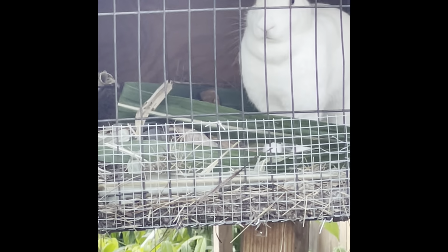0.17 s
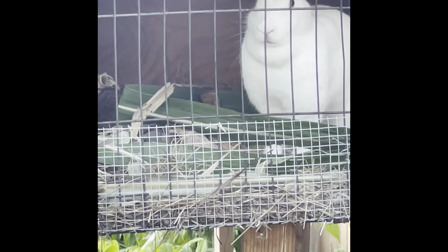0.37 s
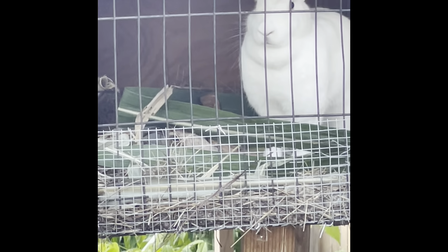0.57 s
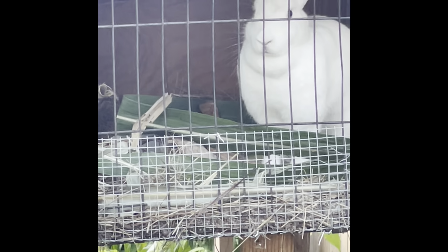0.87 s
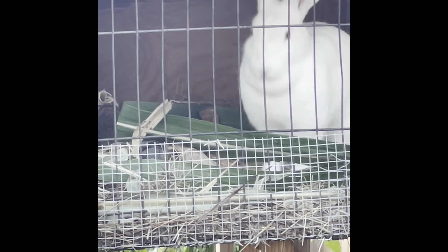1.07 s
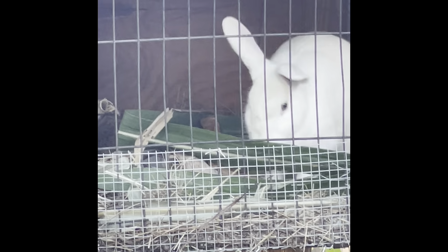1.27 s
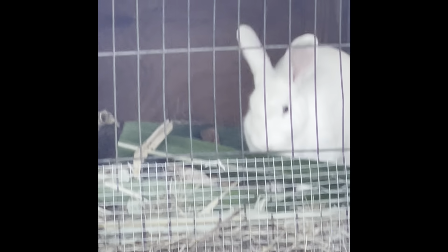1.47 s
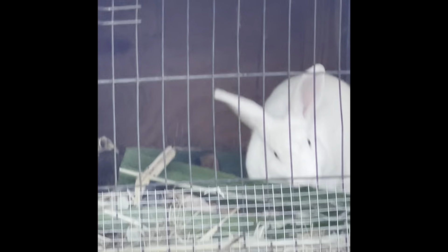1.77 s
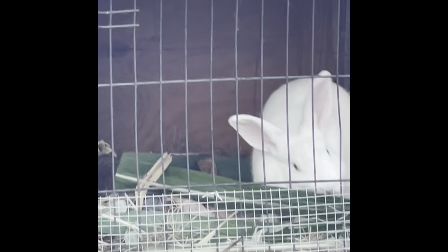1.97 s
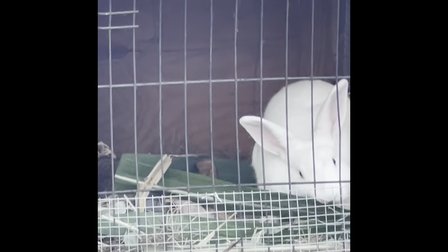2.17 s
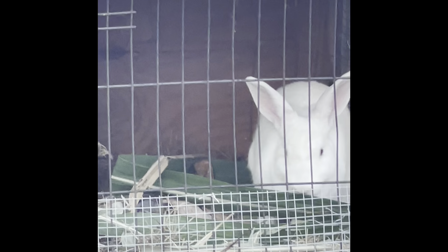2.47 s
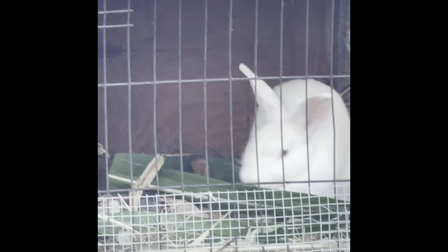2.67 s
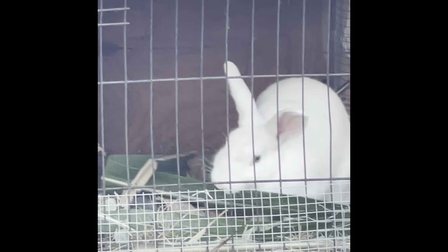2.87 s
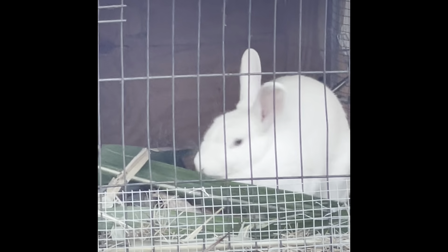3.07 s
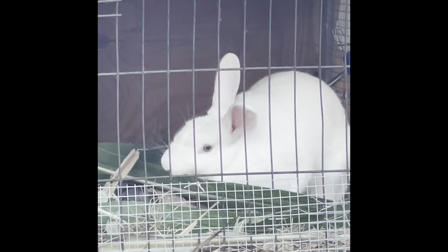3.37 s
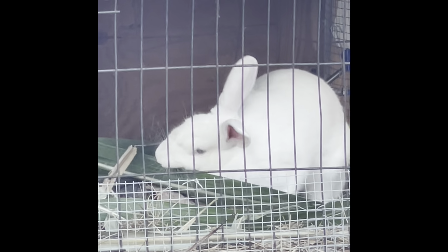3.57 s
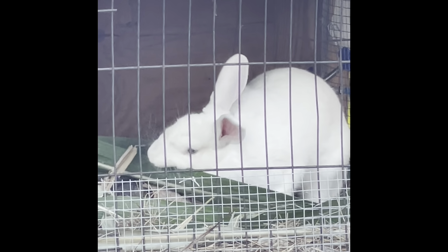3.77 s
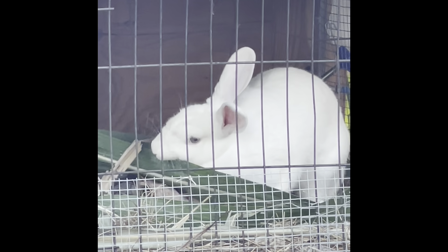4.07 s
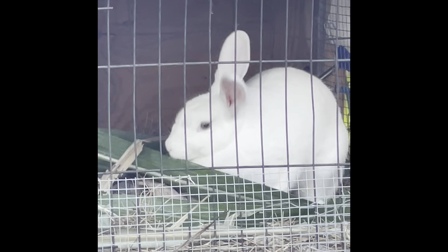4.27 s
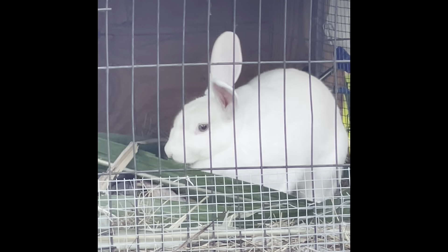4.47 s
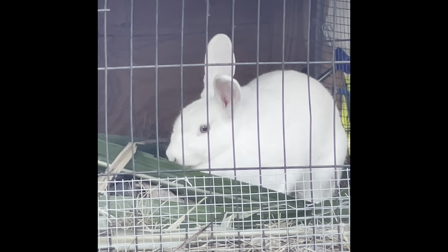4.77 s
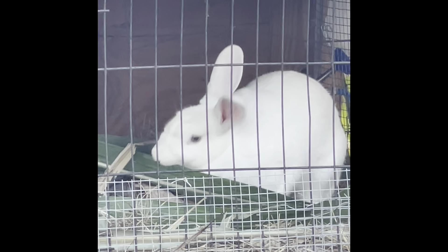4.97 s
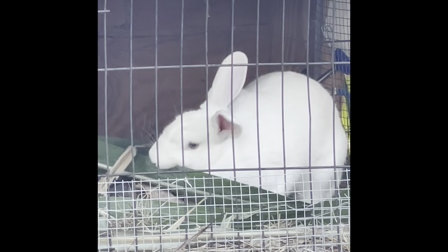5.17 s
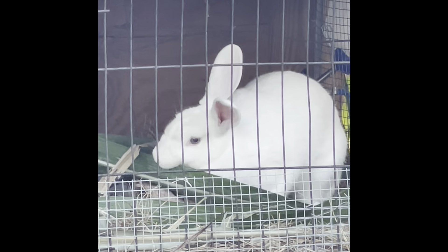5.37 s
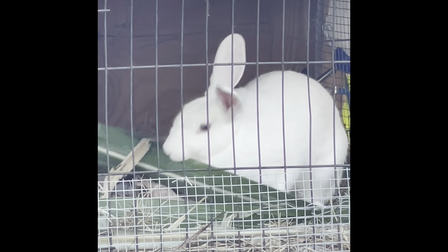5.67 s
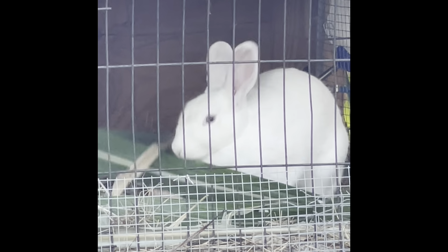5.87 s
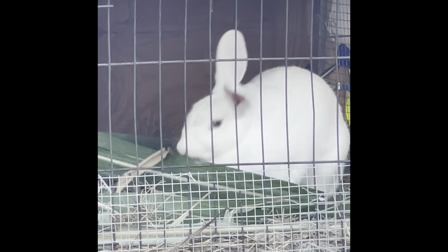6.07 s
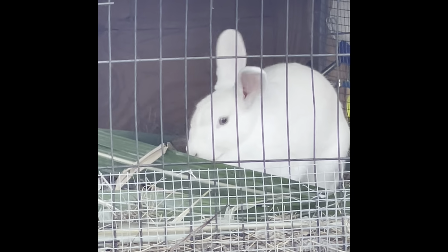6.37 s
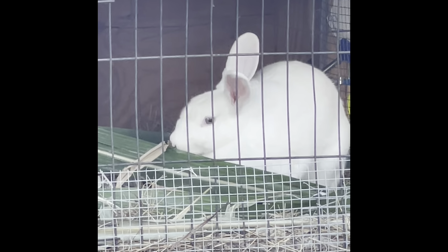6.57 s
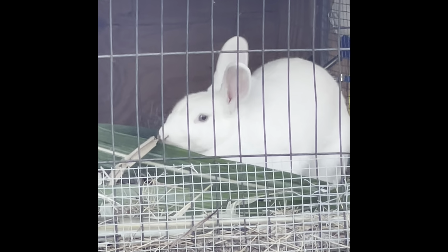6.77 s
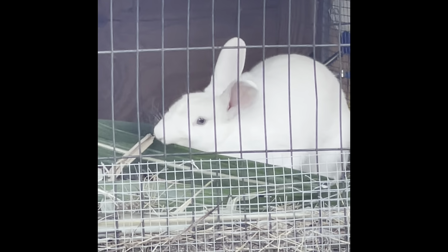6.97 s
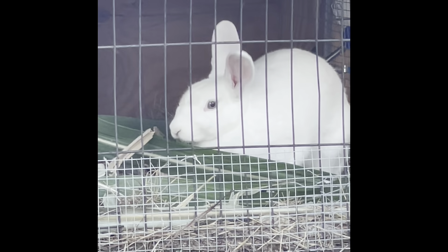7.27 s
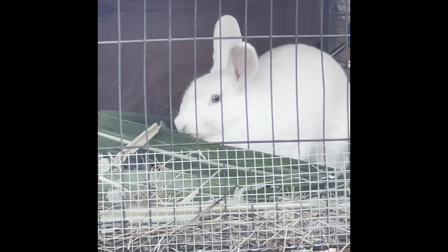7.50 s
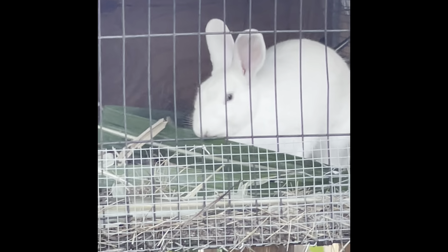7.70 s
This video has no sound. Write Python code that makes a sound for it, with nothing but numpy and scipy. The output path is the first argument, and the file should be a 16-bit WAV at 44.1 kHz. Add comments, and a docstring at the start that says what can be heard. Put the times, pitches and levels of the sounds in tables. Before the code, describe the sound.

A quiet garden has a continuous deep rumble, a soft, gently swelling neighbourhood wash and thin, high microphone hiss. At about 1.0 s a nearby jay gives a harsh call lasting under a third of a second: a raspy upward scoop, a clearer piercing note, then a rough drop, with brief outdoor echoes. Similar calls come at 3.1 and 5.2 s. At 1.7 s there is a small crisp leaf rustle. Around 2.0 s a distant jay answers, duller and much quieter, alongside a tiny high chip; more faint, sagging chips come near 2.5, 4.1 to 4.5, and 6.9 to 7.4 s. The rabbit scrapes leaves and straw lightly around 2.9, 3.9 and 5.8 s, with a tick near 7.2 s. The far jay replies at 7.6 s, the near one calls lastly at 7.9 s, and dry rustling becomes busiest from 8.2 s to the end at 8.5 s.

```python
"""A garden, over a low outdoor rumble, a neighbourhood wash and microphone hiss, all shaped noise.
At 1 s a near blue jay gives the first of four harsh calls, about two seconds apart up to 3.1 and 5.2 s,
the last at 7.9 s: harmonic stacks broken by a rasp. A far jay answers at 2 and 7.6 s in the same kind of voice.
From 1.7 s a rabbit stirs leaves and straw in its wire hutch, grainy noise busiest after 8.2 s.
Between 2 and 7.5 s a small far bird chips now and then: short sagging sine notes."""
import sys
import numpy as np
from scipy import signal
from scipy.fft import rfft, irfft, next_fast_len
from scipy.io import wavfile
from scipy.ndimage import map_coordinates

SR = 44100
rng = np.random.default_rng(int(sys.argv[2]) if len(sys.argv) > 2 else 0)


def bounce(signal):
    """Save signal as a 16-bit WAV file at the path given by the first command-line argument."""
    frames = np.transpose(np.atleast_2d(signal))
    limited = np.clip(frames, -1, 1)
    pcm = np.round(limited * 32767).astype(np.int16)
    wavfile.write(sys.argv[1], SR, pcm)


N = 376525

# Spectrum of the low outdoor rumble. Each row: frequency in Hz, relative density in dB per Hz.
RUMBLE_SPECTRUM = [(16, -42), (27, -21), (35, -5), (40, 7.5), (45, -1.5), (70, 1.2), (85, -0.25),
                   (110, -1.5), (143, .5), (172, -6.5), (194, -4), (215, -8), (310, -15.5), (600, -40.5),
                   (1500, -120)]
# Spectrum of the far wash of the neighbourhood. Each row: frequency in Hz, relative density in dB per Hz.
WASH_SPECTRUM = [(150, -40), (330, -0.5), (480, -1.07), (650, -1.93), (1000, -7), (1400, -15.5),
                 (2000, -25), (3000, -35.5), (4000, -47), (5500, -45.5), (12000, -73.5)]
# Slow course of the wash. Each row: time in seconds, relative level in dB.
WASH_COURSE = [(0.0, -49), (7.37, -51.5), (7.39, -52.5), (8.51, -50.5), (8.54, -53)]
# Likeness of left and right in background and hiss. Each row: frequency in Hz, correlation.
LEFT_RIGHT_LIKENESS = [(120, .996), (300, .983), (480, .91), (700, .63), (1200, .26), (1600, .8),
                       (2000, .93), (5000, .91), (8000, .95)]
# Resonances in the microphone hiss. Each row: centre in Hz, width in Hz, relative level in dB.
HISS_BANDS = [(5147, 140, -3), (6637, 290, 0.5), (8340, 550, 1), (11100, 1930, -13.5)]
# Phase by which the recorder's stereo widening sets the left channel ahead of the right. Each row: frequency in
# Hz, lead in radians.
LEFT_LEAD = [(450, 0), (750, .5), (1200, -1.1), (1700, 0), (2700, .7), (4100, .75), (4700, 2.2),
             (5050, 4.4), (5500, 6.2), (6200, 6.4), (8900, 9.3), (9600, 9.55), (11900, 12.4), (14000, 12.6)]
TOP_HZ = 14350  # upper limit of the microphones

# First echoes from hutch, fence and trees. Each row: delay in seconds, level in dB re the direct sound.
FIRST_ECHOES = [(.0043, -8.5), (.011, -8.5), (0.022, -13), (.041, -18), (0.065, -24)]
# The far wall, heard through foliage. Each row: frequency in Hz, echo level in dB re the direct sound.
FAR_WALL_ECHO = [(1900, -22), (2950, -14.5), (4000, -20), (6000, -13), (9000, -25)]
# Dying away of the garden's scatter. Each row: frequency in Hz, time to fall 60 dB in seconds.
GARDEN_DECAY = [(1000, 0.31), (3000, 0.792), (6000, 0.57), (12000, 0.13)]

# Notes of the small far bird. Each row: middle in seconds, pitch there in Hz, relative level in dB,
# half length in seconds.
CHIP_NOTES = [(1.969, 4100, -77, 0.044), (2.48, 4440, -83, 0.14), (4.084, 3890, -82, 0.043),
              (4.29, 4430, -84, 0.066), (4.491, 4360, -83, 0.056), (6.931, 3530, -84, 0.062),
              (7.04, 4002, -82, .06), (7.22, 4560, -82, .07), (7.44, 4440, -81, .045)]

# Moves of the rabbit. Each row: peak time in seconds, relative level of the leaves in dB,
# rise constant in seconds, time to fall 60 dB in seconds, level of the stalks in dB re the leaves.
RABBIT_MOVES = [(1.73, -58.5, 0.00089, 0.12, -17.5), (2.875, -69, 0.016, 0.28, 2),
                (3.822, -66.5, .004, 0.11, 4.5), (3.937, -61.5, 0.00204, 0.115, 1.5),
                (5.69, -72.5, 0.09, 0.55, 6.5), (5.865, -76.5, 0.0135, 0.18, 10),
                (7.159, -65, .001, 0.041, -16.5), (8.213, -57, 0.043, 0.2, 1),
                (8.35, -70.5, 0.045, 0.35, 6), (8.43, -73.5, 0.018, 0.32, 1.5),
                (8.465, -67, .005, 0.12, 9.5), (8.51, -56.5, 0.0081, 0.153, 3.5)]
# Spectrum of dry leaves. Each row: frequency in Hz, relative density in dB per Hz.
LEAF_SPECTRUM = [(2500, -31), (5000, -3), (7000, 4), (8500, 3.5), (11500, 6), (14000, -37.5)]
# Spectrum of scraped stalks. Each row: frequency in Hz, relative density in dB per Hz.
STALK_SPECTRUM = [(500, -29), (1500, 8), (3200, 2), (5500, -1.5), (8000, -31)]

# Throat of the far jay, dulled by distance. Each row: frequency in Hz, gain in dB.
FAR_JAY_THROAT = [(1700, 2), (2550, -6.5), (3350, -2.5), (4150, -17.5), (5100, -18), (5950, -5),
                  (7000, -14), (9000, -35)]
# Calls of the far jay. Each row: start in seconds, length in seconds, opening pitch in Hz,
# share of the pitch lost by the end, relative level in dB.
FAR_JAY_CALLS = [(2.019, .31, 870, .125, -69), (7.615, .256, 845, .055, -69)]
# Far jay: dB added at both ends, second harmonic in dB, treble in dB
ANSWER_ENDS_DB, ANSWER_SECOND_DB, ANSWER_TREBLE_DB = -0.5, -10, -11
ANSWER_ROUGH, ANSWER_ENDS_ROUGH = 0.15, 0.15  # roughness 0-1 in the middle, and what the ends add

# Throat and beak of the near jay. Each row: frequency in Hz, gain in dB.
NEAR_JAY_THROAT = [(1400, 2), (1980, 4), (2450, -11.5), (2950, 0), (3500, -10), (4100, -2), (4700, -5.5),
                   (5200, -6), (6000, -2.5), (7000, -5.5), (8200, -12.5), (9600, -19.5), (11200, -16.5),
                   (13500, -54)]
# Calls of the near jay. Each row: start in seconds, time until the voice breaks in seconds, top pitch in Hz,
# share of the pitch it scoops up from below, sag in Hz per second, relative level in dB,
# second harmonic in dB, treble in dB, roughness of the attack 0-1, time until the swell in seconds,
# swell in dB, length of the broken tail in seconds.
NEAR_JAY_CALLS = [(1.037, 0.21, 1038, 0.21, 550, -51.5, 2, -3.5, 0.93, 0.144, 6.5, 0.074),
                  (3.117, 0.16, 1019, 0.16, 530, -52.5, 2.5, -4.5, .8, 0.099, 3.5, 0.086),
                  (5.219, .184, 1027, .14, 562, -53.5, 4.5, -2, 0.38, .121, 9.5, .078),
                  (7.913, 0.15, 985.6, 0.19, 300, -53, -0.5, -5, .8, 0.091, 3, 0.096)]
JITTER = 0.062  # pitch scatter of a fully harsh voice, near or far, as a share of the pitch
SCOOP_S, CREST_S = 0.04, 0.078  # time constant of the scoop; time after which the pitch sags
DROP, DROP_S = 0.29, 0.032  # share of the pitch lost once the voice breaks; time constant of that loss
ATTACK_S, RELEASE_S = 0.015, 0.03  # rise of the level (both ends of a far call) and final fade
CLEAR_S, CLEARING_S, BREAK_S = 0.052, 0.021, 0.0083  # time until clear; time to clear; time to break
# Roughness 0-1 of the clear middle and of the tail; time constant of the tail settling
CLEAR_ROUGH, TAIL_ROUGH, SETTLE_S = 0.074, 0.85, 0.091
BURST_DB, TAIL_DB, TIRE_DB_PER_S = 6, 1.5, 14  # push of attack and tail; loss of level after the crest
ATTACK_SECOND_DB, SECOND_FADE_DB_PER_S = -12, 62  # second harmonic: weak in the attack, fades after the crest
ATTACK_TREBLE_DB, TAIL_TREBLE_DB = -3, -1  # the harsh ends are duller
SWELL_S = 0.0085  # half width of the swell


def amp(db):
    """Decibels to gain."""
    return 10 ** (np.asarray(db) / 20)


def unit(x):
    """x at rms 1."""
    return x / np.sqrt(np.mean(x ** 2) + 1e-20)


def along(points, hz):
    """Points of frequency and value, read on a log frequency axis."""
    f, v = np.transpose(points)
    return np.interp(np.log(hz + 1), np.log(f + 1), v)


def ramp(t, length):
    """0 before t = 0, rising straight to 1 over the length."""
    return np.clip(t / length, 0, 1)


def wobble(rate, size=N):
    """A smooth random curve, rate knots a second."""
    knots = rng.standard_normal(int(size * rate / SR) + 4)
    return map_coordinates(knots, [np.arange(size) * rate / SR])


def filtered(x, response):
    """x times a complex response of frequency."""
    m = next_fast_len(N + SR // 2)
    return irfft(rfft(x, m) * response(np.fft.rfftfreq(m, 1 / SR)), m)[..., :N]


def noise(spectrum):
    """Coloured noise of rms 1."""
    return unit(filtered(rng.standard_normal(N), lambda hz: amp(along(spectrum, hz))))


def diffuse(gain):
    """Stereo noise of rms 1 from all around: sum and difference set how alike left and right are."""
    def mid_side(hz):
        turn = np.arccos(np.clip(along(LEFT_RIGHT_LIKENESS, hz), -1, 1)) / 2
        return gain(hz) * np.array([np.cos(turn), np.sin(turn)])

    mid, side = filtered(rng.standard_normal((2, N)), mid_side)
    return unit(np.array([mid + side, mid - side]))


def background(rumble_db=-40.0, wash_db=1.5, swell_db=0.55):
    """A deep steady rumble under a wider, gently swelling wash, both filtered noise."""
    course_db = np.interp(np.arange(N) / SR, *np.transpose(WASH_COURSE))
    rumble = amp(rumble_db) * diffuse(lambda hz: amp(along(RUMBLE_SPECTRUM, hz)))
    wash = diffuse(lambda hz: amp(along(WASH_SPECTRUM, hz)))
    return rumble + amp(course_db + wash_db + swell_db * wobble(5)) * wash


def hiss(level_db=-70.5, flat_db=-26):
    """Microphone hiss, gathered in a few narrow bands over a thin broad bed."""
    def gain(hz):
        bed = amp(flat_db + along([(7000, -1.5), (10000, -21), (14000, -9.0)], hz))
        band_power = sum(amp(db) ** 2 / (1 + (2 * (hz - centre) / width) ** 4)
                         for centre, width, db in HISS_BANDS)
        return np.sqrt(bed ** 2 + band_power)

    return amp(level_db) * diffuse(gain)


def garden(x, width=0.14):
    """Scatter from the foliage: a noise tail in which each frequency dies at its own speed."""
    hz, t, z = signal.stft(rng.standard_normal((2, SR)), SR, nperseg=256)
    decay = amp(-60 * t / along(GARDEN_DECAY, hz)[:, None])
    tail = signal.istft(z * decay, SR, nperseg=256)[1]
    tail = tail / np.linalg.norm(tail[0])
    mid, side = signal.fftconvolve(x[None], tail, axes=1)[:, :N]
    return np.array([mid + width * side, mid - width * side])


def walls(x, far_delay=0.1):
    """Direct sound, first echoes that make gliding harmonics swell and fade, and one late slap."""
    def echo(hz, delay, db):
        return amp(db) * np.exp(-2j * np.pi * hz * delay)

    def response(hz):
        first = sum(echo(hz, delay, db) for delay, db in FIRST_ECHOES)
        return 1 + first + echo(hz, far_delay, along(FAR_WALL_ECHO, hz))

    return filtered(x, response)


def small_bird(fall=0.022):
    """Short, thin sine notes that quiver and sag a little in pitch."""
    out, quiver = np.zeros(N), wobble(250)
    for middle, hz, db, half in CHIP_NOTES:
        i = np.arange(int((middle - half) * SR), int((middle + half) * SR))
        pitch = hz * (1 - fall * (i / SR - middle) / half + 0.014 * quiver[i])
        tone = np.sin(2 * np.pi * np.cumsum(pitch) / SR)
        out[i] += amp(db + 6.5) * np.hanning(len(i)) * tone
    return out


def rabbit(grain_db=2.0):
    """Each move crackles dry leaves and scrapes stalks, as noise under a grainy, decaying push."""
    t, leaves, stalks = np.arange(N) / SR, np.zeros(N), np.zeros(N)
    for peak, db, rise, t60, stalk_db in RABBIT_MOVES:
        decay = amp(db - 60 * np.maximum(t - peak, 0) / t60)
        push = decay * np.exp(np.minimum(t - peak, 0) / rise)
        leaves += push
        stalks += push * amp(stalk_db)
    grains = unit(amp(grain_db * wobble(700)))
    return grains * (leaves * noise(LEAF_SPECTRUM) + stalks * noise(STALK_SPECTRUM))


def jay(calls, throat, rasp, rasp_hz, air_db, focus_db, uneven_db, count=14):
    """A jay's voice: a harmonic stack, coloured by the throat, that breaks into a rasp where rough."""
    out = np.zeros(N)
    shake, drift = wobble(560), wobble(300)
    air = noise([(100, -3), (380, -2.0), (900, -25), (2000, -80)])
    order = np.arange(2, count)[:, None]  # the throat holds the fundamental back
    for i, pitch, gain, second_db, treble_db, rough, strain in calls:
        phase = 2 * np.pi * np.cumsum(pitch * (1 + JITTER * rough * shake[i])) / SR
        hz = order * pitch
        treble_share = along([(4400, 0.13), (5400, 0.99)], hz)
        colour_db = along(throat, hz) + second_db * (order == 2) + treble_db * treble_share
        # strain at the ends shifts the balance between the fourth harmonic and the others
        press_db = focus_db * strain * (np.exp(-((order - 4.25) / 0.57) ** 2) - 0.45)
        # each harmonic swells and fades a little on its own
        sway_db = uneven_db * np.array([wobble(44.9, size=SR // 2)[:len(i)] for _ in order])
        level = amp(colour_db + press_db + sway_db)
        voice = np.sqrt(2) * np.sum(level * np.sin(order * phase), axis=0)
        # the other side of the syrinx beats against the tone and throws sidebands between the harmonics
        beat = np.sin(2 * np.pi * np.cumsum(rasp_hz * (1 + 0.296 * drift[i])) / SR)
        breath = (amp(air_db) + 0.36 * rough ** 2) * air[i]
        flutter = 1 + rough * rasp * beat + breath
        out[i] += gain * voice * flutter / np.sqrt(1 + (rough * rasp) ** 2)
    return out


def far_call(start, length, top_hz, fall, db):
    """Course of a far call: a falling note, weaker and rougher at both ends."""
    i = np.arange(int(start * SR), int((start + length) * SR))
    t = (i - i[0]) / SR
    ends = (2 * t / length - 1) ** 2
    pitch = top_hz * (1 - fall * (t / length) ** 2)
    gain = amp(db + ANSWER_ENDS_DB * ends) * ramp(np.minimum(t, t[-1] - t), ATTACK_S)
    rough = ANSWER_ROUGH + ANSWER_ENDS_ROUGH * ends
    return i, pitch, gain, ANSWER_SECOND_DB, ANSWER_TREBLE_DB, rough, ends


def near_call(start, break_s, top_hz, scoop, sag, db, second_db, treble_db, attack_rough, swell_s, swell_db, tail_s):
    """Course of a near call: harsh scoop up, clear sagging note that swells once, break, drop and settling."""
    i = np.arange(int(start * SR), int((start + break_s + tail_s) * SR))
    t = (i - i[0]) / SR
    after_crest, broken = np.maximum(t - CREST_S, 0), np.maximum(t - break_s, 0)
    rise = 1 - scoop * np.exp(-(t / SCOOP_S) ** 3)
    drop = 1 - DROP * (1 - np.exp(-broken / DROP_S))
    pitch = (top_hz - sag * (after_crest - broken)) * rise * drop  # the sag stops at the break

    attack, tail = ramp(CLEAR_S - t, CLEARING_S), ramp(broken, BREAK_S)
    settling = np.exp(-(broken / SETTLE_S) ** 2)
    rough = attack_rough * attack + CLEAR_ROUGH * (1 - attack - tail) + TAIL_ROUGH * tail * settling

    swell = swell_db * np.exp(-((t - swell_s) / SWELL_S) ** 2)
    level_db = db + BURST_DB * attack + TAIL_DB * tail - TIRE_DB_PER_S * after_crest + swell
    gain = amp(level_db) * ramp(t, ATTACK_S) * ramp(t[-1] - t, RELEASE_S)
    second = second_db + ATTACK_SECOND_DB * attack - SECOND_FADE_DB_PER_S * after_crest
    # taking the swell off the treble leaves it to the low harmonics
    treble = treble_db + ATTACK_TREBLE_DB * attack + TAIL_TREBLE_DB * tail - swell
    return i, pitch, gain, second, treble, rough, attack + tail


def scene():
    """The near jay stands mostly direct before the microphones; the far birds are wetter."""
    answers = jay([far_call(*row) for row in FAR_JAY_CALLS], FAR_JAY_THROAT,
                  rasp=0.77, rasp_hz=428, air_db=-16, focus_db=-1.0, uneven_db=2.8)
    far = answers + amp(-3.5) * small_bird()
    near = jay([near_call(*row) for row in NEAR_JAY_CALLS], NEAR_JAY_THROAT,
               rasp=0.54, rasp_hz=340, air_db=-42.0, focus_db=11.5, uneven_db=3)
    direct = amp(-1.5) * walls(near) + amp(-2.0) * far + rabbit()
    scattered = garden(amp(-13.5) * near + amp(-3) * far)
    return background() + hiss() + scattered + direct


def record(dry):
    """The recorder's stereo widening turns left and right apart in phase, and nothing passes above the band
    limit."""
    def response(hz):
        half_lead = 0.5 * np.array([[1], [-1]]) * along(LEFT_LEAD, hz)
        return np.exp(1j * half_lead) * (hz < TOP_HZ)

    return filtered(dry, response)


dry = scene()
out = record(dry)
bounce(out)
```